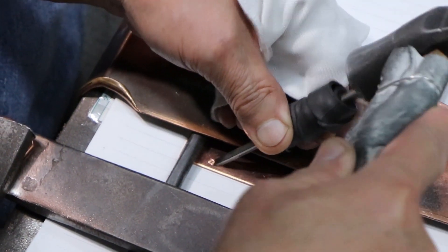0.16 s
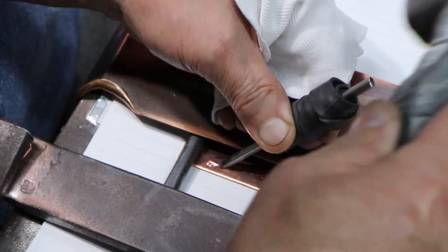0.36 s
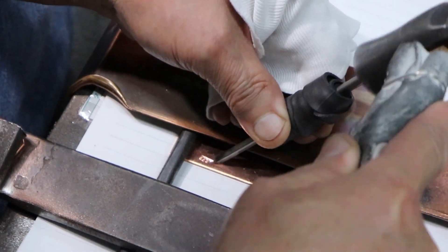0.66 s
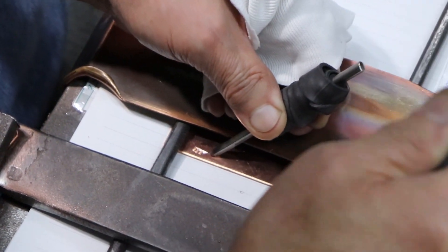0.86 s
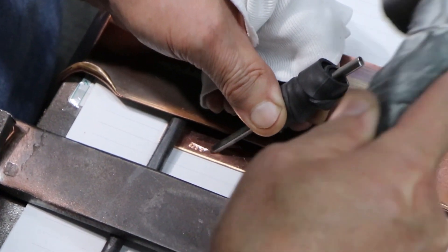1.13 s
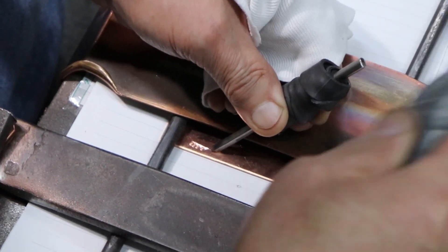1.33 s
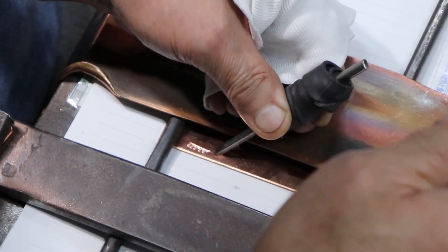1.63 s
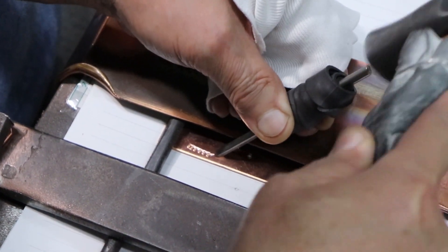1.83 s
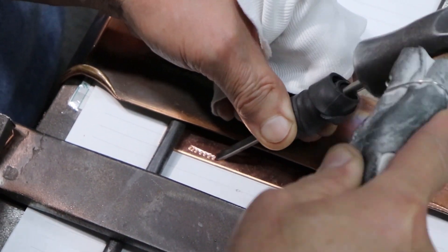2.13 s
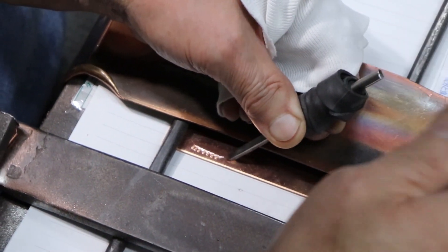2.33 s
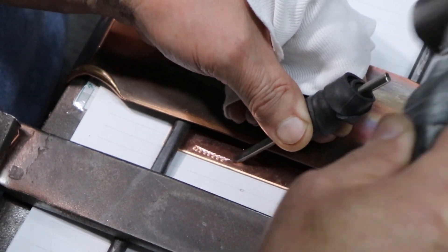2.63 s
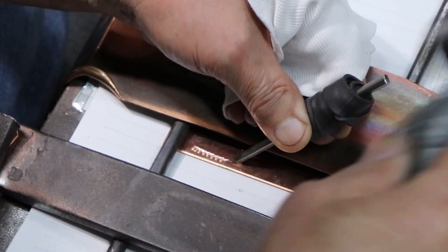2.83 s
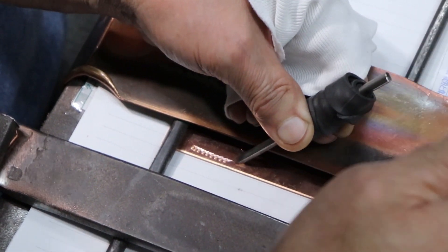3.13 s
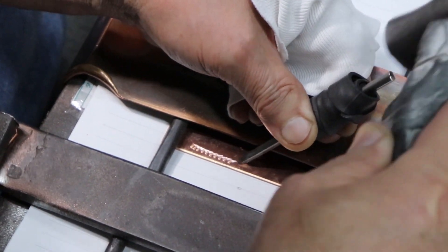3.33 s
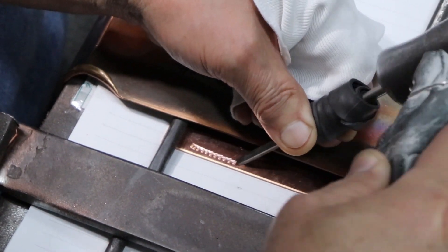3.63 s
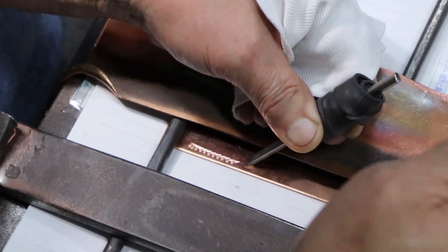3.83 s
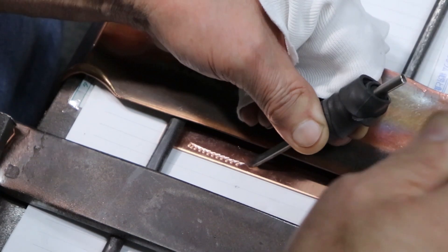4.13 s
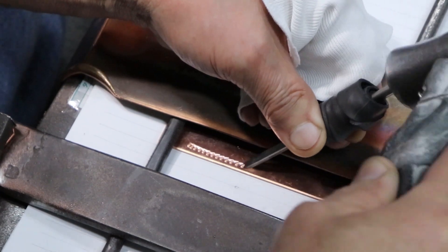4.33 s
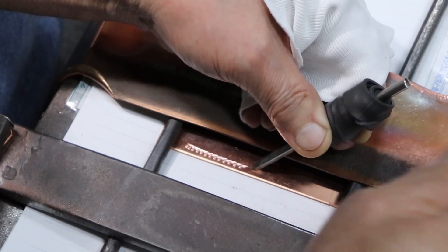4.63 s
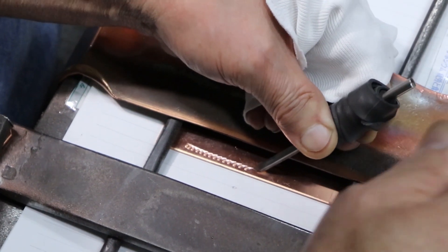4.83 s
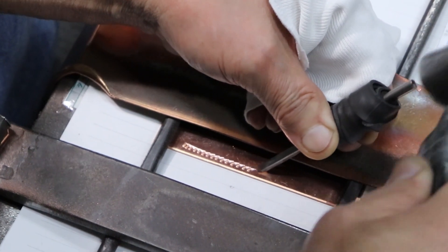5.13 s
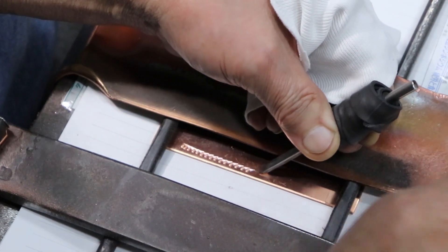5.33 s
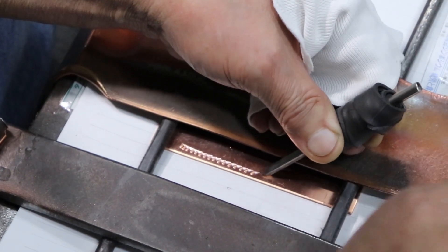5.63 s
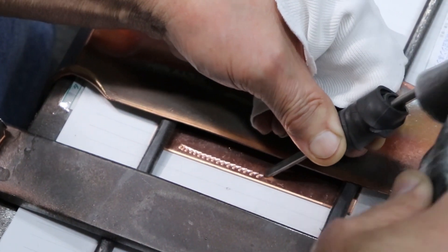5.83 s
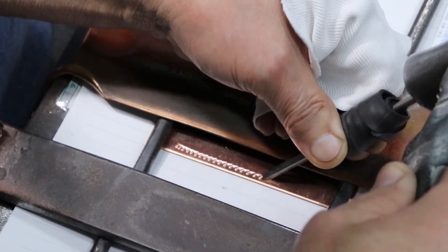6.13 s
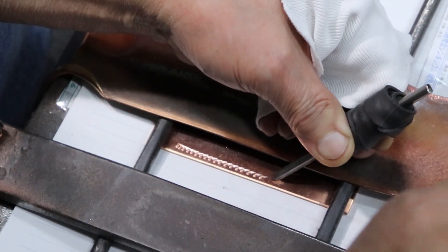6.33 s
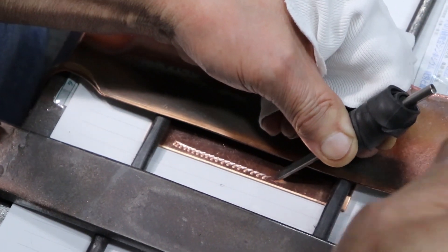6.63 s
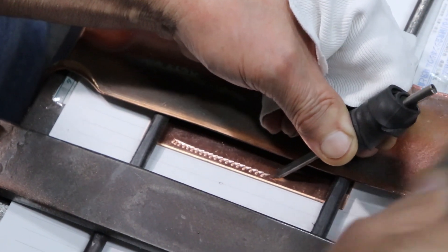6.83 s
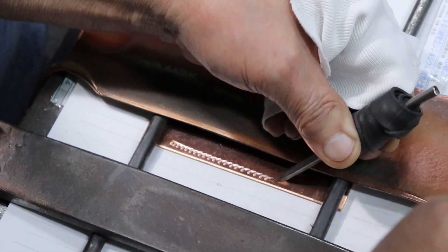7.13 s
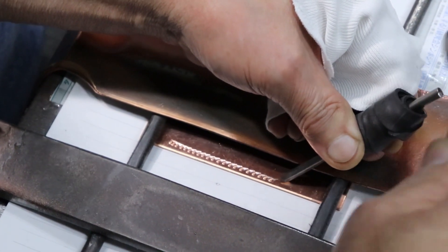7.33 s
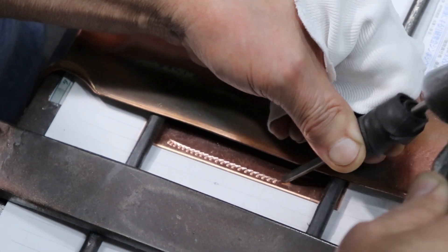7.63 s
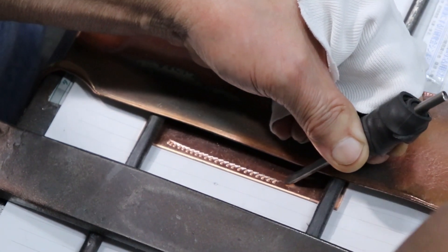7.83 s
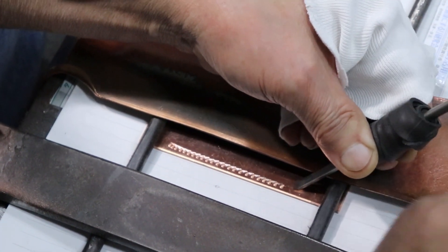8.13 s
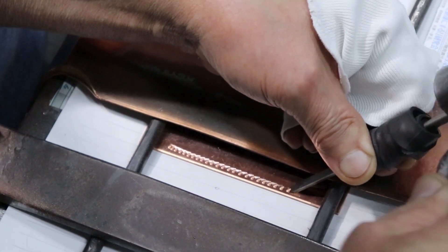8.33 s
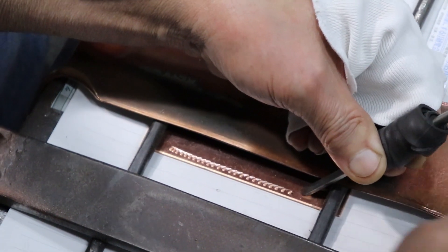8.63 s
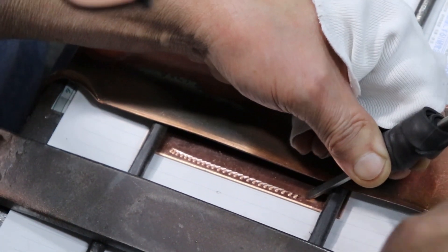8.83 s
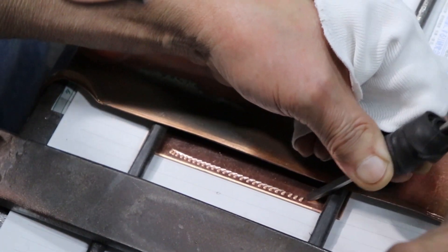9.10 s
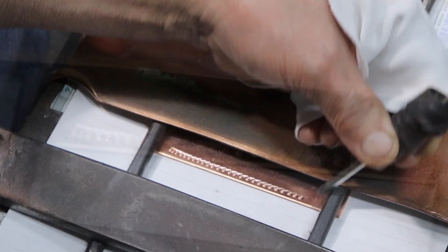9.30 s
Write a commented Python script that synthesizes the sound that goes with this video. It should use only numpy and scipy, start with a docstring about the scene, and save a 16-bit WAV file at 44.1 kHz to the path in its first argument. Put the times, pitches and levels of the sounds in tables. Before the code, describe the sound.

In a quiet workshop with short, lively reverberation, metal hits metal in regular strokes: hammer on chisel, chisel into copper. The clinks are hard, dry and quickly damped, so loud that the close microphone slightly overloads. Early blows have more high chisel ring; later ones gain more bench thump and plate ping. Soft scuffs and knocks of tools are barely audible in the gaps, with a light one after the last blow.

```python
"""Still workshop air (coloured noise), then 25 near-even hammer blows drive a steel chisel along a copper plate.
Each blow cracks (noise burst), rings plate and chisel (damped sines), then thumps the bench a moment later.
Reverberation (convolved noise bands) is heard for about a fifth of a second. From 1.3 s, tools knock lightly
between some blows and after the last (filtered noise). The close microphone overloads (soft ceiling, cut top)."""
import sys
import numpy as np
from scipy import signal
from scipy.fft import rfft, irfft, next_fast_len
from scipy.io import wavfile

SR = 44100
rng = np.random.default_rng(int(sys.argv[2]) if len(sys.argv) > 2 else 0)


def materialize(psi):
    """Save the field psi as 16-bit PCM at rate SR to the path in sys.argv[1].

    A 1-D psi becomes a single channel; in a 2-D psi each row is a channel.
    """
    bounded = np.clip(np.atleast_2d(psi).T, -1, 1)
    quanta = np.round(bounded * 32767).astype(np.int16)
    wavfile.write(sys.argv[1], SR, quanta)


N = 417186
BLOW_SIZE = SR // 4  # samples per dry blow or knock

# Still air. Each row: frequency in Hz, relative density in dB per Hz.
AIR_SPECTRUM = [(15, -10.5), (35, -3), (75, 1), (115, -3), (230, -3), (420, -8), (600, -10.5),
                (1300, -12.5), (2300, -15.5), (3700, -19), (7000, -21.5), (11000, -27), (16000, -32.5)]
AIR_RMS_DB = -50.5
# Stereo likeness of the air. Each row: frequency in Hz, left-right correlation.
AIR_LIKENESS = [(30, 0.91), (250, 0.71), (1000, 0.22), (4000, .3), (16000, .2)]
# Stereo likeness of hits and room. Each row: frequency in Hz, left-right correlation.
HIT_LIKENESS = [(60, .8), (300, 0.94), (700, 0.89), (2000, 0.099), (6000, 0.56), (14000, 0.073)]
# Stereo balance of blows. Each row: frequency in Hz, left minus right in dB.
BALANCE = [(300, -0.5), (600, 0), (1400, -2), (2600, -6), (5000, -2), (9000, -1)]
# Hammer blows. Each row: start in seconds, relative force in dB.
BLOWS = [(0.2543, -2.5), (0.6789, -3.5), (1.081, -2.5), (1.4552, -3), (1.836, -2.5), (2.2158, -2.5),
         (2.5793, -3), (2.945, -3), (3.3096, -3), (3.686, -3), (4.0487, -2.1), (4.4088, -1), (4.7671, -2.5),
         (5.1344, -1.8), (5.4932, -0.5), (5.862, -1), (6.22, -1), (6.5838, -0.5), (6.944, -1.5),
         (7.307, -0.6), (7.67, -0.5), (8.0333, -0.5), (8.3976, -0.5), (8.762, 0), (9.1393, -0.7)]
# Crack of steel on steel. Each row: frequency in Hz, relative density in dB per Hz.
CRACK_SPECTRUM = [(40, -75.5), (200, -56), (600, 0.5), (1500, 0.5), (2800, 5.5), (3800, 1), (5800, -1.5),
                  (6900, -3), (8500, 5.5), (11000, -5), (16000, -12.5)]
# Copper plate and clamp. Each row: frequency in Hz, relative level in dB, T60 in seconds.
PLATE_MODES = [(717, -18.5, .06), (928, -18, 0.021), (959, -32, 0.13), (1099, -5.5, 0.025),
               (1530, -24, 0.032), (2320, -18.5, 0.02), (2640, -9, 0.031), (3452, -10.5, 0.025),
               (4285, -10, 0.036), (5140, -18, 0.0092), (7660, -9, 0.0082), (8920, -2.5, 0.0079),
               (9940, -8.5, 0.0047)]
# Lower plate tone: quiet lasting ring, then strong short knock.
# Each row: frequency in Hz, peak relative level in dB, T60 in seconds.
LOWER_TONE = [(1404, -20.5, .16), (1410, -8.5, .035)]
# Crowd of high plate modes. Each row: frequency in Hz, relative density in dB per Hz.
PING_SPECTRUM = [(3500, -35.5), (4900, -11), (5480, -2.5), (5800, -1.5), (6050, -0.5), (6300, -3),
                 (6800, -19), (9000, -40.5)]
# Chisel as a free bar damped by the fingers.
# Each row: multiple of the easy-hold upper bending mode, relative level in dB, T60 in seconds.
CHISEL_MODES = [(.33, -1.5, 0.01), (0.349, -4.5, 0.012), (0.373, -5.5, 0.025), (0.998, 0.5, 0.022)]
# Tip chatter in the cut, smearing the ring.
# Each row: multiple of the easy-hold upper bending mode, relative density in dB per Hz.
CHATTER_SPECTRUM = [(0.251, -30), (0.331, -6), (0.374, 4.5), (.45, -23), (.85, -15), (.94, -5), (1.039, 2),
                    (1.102, -11), (1.25, -28.5), (2.001, -35.5)]
# Fingers' hold, interpolated. Each row: time in seconds, chisel gain in dB, upper bending mode in Hz.
GRIP = [(.68, 3, 7480), (1.08, 5, 8255), (3.68, 5, 8250), (4.401, -1, 7930), (5.149, -7, 7730),
        (5.86, -20, 7420), (6.22, -10, 8100), (7.6, -8.5, 8420), (9.14, -10, 9130)]
# Bench under the work. Each row: frequency in Hz, relative level in dB, T60 in seconds.
BENCH_MODES = [(302.4, -9.5, 0.025), (340, 6, 0.028), (403.4, 7.5, 0.021), (509, -16.5, 0.056)]
# Standing waves stirred by the thump. Each row: frequency in Hz, relative level in dB, T60 in seconds.
BOOM_MODES = [(209, -34, 0.54), (243, -38.5, 0.81), (282.6, -31, 0.45), (291, -28, 0.41), (315, -24, 0.32),
              (378, -27, 0.31), (394, -27, 0.17), (454, -24, 0.067)]
# Room wash. Each row: band centre in Hz, relative level in dB, T60 in seconds before the tail is faded out.
ROOM_BANDS = [(61.6, -29.5, 0.43), (151.2, -13.5, .35), (222, -9, 0.21), (310, -12, 0.96),
              (445.4, -8.5, 0.46), (810, -13, 0.55), (1440, -9, 0.45), (3100, -14, 0.42), (6400, -10, .45),
              (9000, -11, 0.4), (12000, -11, 0.47), (16000, -20.5, .3)]
# Wall clusters. Each row: delay in seconds, lift over the wash in dB, spread in seconds.
WALLS = [(.018, 5, 0.0034), (0.071, 2.5, 0.0041), (.135, 0.5, .015)]
# Tool knocks and scuffs. Each row: start in seconds, relative level in dB, lowpass corner in Hz, T60 in seconds.
KNOCKS = [(1.298, -42, 597, 0.083), (1.789, -42.5, 598, .14), (2.185, -43.5, 593, 0.14),
          (3.187, -45, 900, 0.047), (4.118, -35, 2527, 0.037), (4.294, -39.5, 893, 0.082),
          (5.005, -33, 2520, 0.063), (5.055, -32, 890, 0.18), (9.356, -32, 6000, 0.064),
          (9.419, -34.5, 5000, 0.037), (9.426, -38.5, 3500, 0.042)]
# Knock colour before the lowpass. Each row: frequency in Hz, relative density in dB per Hz.
KNOCK_SPECTRUM = [(100, -10), (300, 3.5), (700, -1.5), (1400, -2.5), (2300, 2), (4000, -10.5), (8000, -7.5),
                  (16000, -23)]

# The chisel moves steadily towards the clamp: more thump, more high plate modes.
MIDWAY_S, THUMP_DB_PER_S, PING_DB_PER_S = 4.7, 0.44, 0.28
# Upper plate tone: pitch at midway, rising with travel.
UPPER_HZ, UPPER_RISE_HZ_PER_S, UPPER_PEAK_DB, UPPER_T60_S = 1986, 15, 2.5, 0.03
# Each tone peaks as the chisel passes its antinode.
UPPER_ANTINODE_S, UPPER_FADE_DB_PER_S2 = 4.2, 0.5
LOWER_ANTINODE_S, LOWER_FADE_DB_PER_S2 = 6, 0.5
EASY_HZ = 8300  # upper bending mode under an easy hold


def from_db(db):
    """Convert decibels to amplitude gain."""
    return 10 ** (np.asarray(db) / 20)


def at_hz(points, hz, axis=1):
    """Interpolate a table column over log frequency."""
    points = np.array(points, float)
    return np.interp(np.log(np.maximum(hz, 1)), np.log(points[:, 0]), points[:, axis])


def add(track, start_s, sound):
    """Mix a stereo sound into the track."""
    start = round(start_s * SR)
    track[:, start:start + sound.shape[1]] += sound[:, :N - start]


def noise(spectrum, likeness, size):
    """Shape white mid and side noise by colour and left-right correlation; rms 1."""
    hz = np.fft.rfftfreq(size, 1 / SR)
    mid, side = rfft(rng.standard_normal((2, size)))
    alike = np.clip(at_hz(likeness, hz), -1, 1)
    stereo = np.sqrt(1 + alike) * mid + np.sqrt(1 - alike) * side * [[1], [-1]]
    out = irfft(stereo * from_db(at_hz(spectrum, hz)), size)
    return out / out.std()


def air():
    """Still air as steady coloured noise."""
    return from_db(AIR_RMS_DB) * noise(AIR_SPECTRUM, AIR_LIKENESS, next_fast_len(N))[:, :N]


def crack(spectrum, t60_s):
    """A burst of scattered waves: random phases, smooth magnitude; starts at about rms 1."""
    t = np.arange(BLOW_SIZE) / SR
    hz = np.fft.rfftfreq(BLOW_SIZE, 1 / SR)
    fading = from_db(-60 * t / t60_s)
    # The phase of fading noise holds the burst's timing.
    phase = np.angle(rfft(noise(spectrum, HIT_LIKENESS, BLOW_SIZE) * fading))
    colour = from_db(at_hz(spectrum, hz) + at_hz(BALANCE, hz) * [[0.5], [-0.5]])
    burst = irfft(colour * np.exp(1j * phase), BLOW_SIZE) * fading ** 0.25
    return burst / burst.std() * np.sqrt(np.mean(fading ** 2))


def ring(modes, scatter_db, detune, lag_s):
    """Damped sines; strength, pitch and ear paths vary slightly at random per call."""
    hz, db, t60_s = np.array(modes, float).T[:, :, None]
    strength, pitch, path = rng.standard_normal((3, len(hz), 1))
    t = np.arange(BLOW_SIZE) / SR
    hz = hz * (1 + detune * pitch)
    decay = from_db(db + scatter_db * strength) * np.exp(-np.log(1000) * t / t60_s)
    ears = []
    for side in (0.5, -0.5):
        gain = from_db(side * at_hz(BALANCE, hz))
        wave = np.sin(2 * np.pi * hz * (t + side * lag_s * path))
        ears.append((gain * decay * wave).sum(0))
    return np.array(ears)


def plate(blow_s, crack_db=7.0, crack_t60_s=0.033, ping_t60_s=0.031):
    """Contact crack and copper ring, coloured by where the chisel stands."""
    travel_s = blow_s - MIDWAY_S
    upper_hz = UPPER_HZ + UPPER_RISE_HZ_PER_S * travel_s
    upper_db = UPPER_PEAK_DB - UPPER_FADE_DB_PER_S2 * (blow_s - UPPER_ANTINODE_S) ** 2
    lower_fade_db = LOWER_FADE_DB_PER_S2 * (blow_s - LOWER_ANTINODE_S) ** 2
    lower = [(hz, db - lower_fade_db, t60_s) for hz, db, t60_s in LOWER_TONE]
    modes = [*PLATE_MODES, (upper_hz, upper_db, UPPER_T60_S), *lower]
    tones = ring(modes, scatter_db=1.0, detune=0.003, lag_s=0.00003)
    ping = from_db(PING_DB_PER_S * travel_s) * crack(PING_SPECTRUM, ping_t60_s)
    return from_db(crack_db) * crack(CRACK_SPECTRUM, crack_t60_s) + tones + ping


def chisel(blow_s, bending_db=0.46, chatter_db=4.5):
    """The steel bends and its tip chatters; the grip frees or chokes it and shifts its pitch."""
    times_s, gains_db, uppers_hz = np.transpose(GRIP)
    grip_db = np.interp(blow_s, times_s, gains_db)
    upper_hz = np.interp(blow_s, times_s, uppers_hz)

    def mode_hz(multiple):
        """Lower modes follow the grip's shift only in proportion to their pitch."""
        return multiple * (EASY_HZ + min(multiple, 1) * (upper_hz - EASY_HZ))

    modes = [(mode_hz(multiple), db, t60_s) for multiple, db, t60_s in CHISEL_MODES]
    bending = ring(modes, scatter_db=1.3, detune=0.0099, lag_s=0.000025)
    spectrum = [(mode_hz(multiple), db) for multiple, db in CHATTER_SPECTRUM]
    chatter = crack(spectrum, t60_s=0.024)
    return from_db(grip_db) * (from_db(bending_db) * bending + from_db(chatter_db) * chatter)


def thump(blow_s, bench_db=0.25, boom_db=-0.9, delay_s=0.0028, swell_s=0.0046, low_cut_hz=205):
    """The heavy bench gives way a moment after the blow and stirs the room's standing waves."""
    t = np.arange(BLOW_SIZE) / SR
    bench = from_db(bench_db) * ring(BENCH_MODES, scatter_db=1.5, detune=0.011, lag_s=0.00008)
    boom = from_db(boom_db) * ring(BOOM_MODES, scatter_db=1.0, detune=0.013, lag_s=0.00024)
    swelling = (bench + boom) * (1 - np.exp(-t / swell_s))
    low_cut = signal.butter(4, low_cut_hz, "high", fs=SR, output="sos")
    push = signal.sosfilt(low_cut, swelling)
    delayed = np.array([np.interp(t - delay_s, t, side) for side in push])
    return from_db(THUMP_DB_PER_S * (blow_s - MIDWAY_S)) * delayed


def blows():
    """Each blow's force drives plate, chisel and bench together; yields (start in s, sound)."""
    for blow_s, force_db in BLOWS:
        yield blow_s, from_db(force_db) * (plate(blow_s) + chisel(blow_s) + thump(blow_s))


def workshop(events, wet_db=-6.5, build_s=0.0009, tail_fade_s=0.175):
    """Dense reflections build and die band by band, drawn afresh for every event."""
    size = SR // 3
    out = np.zeros((2, N))
    t = np.arange(size) / SR
    hz = np.fft.rfftfreq(size, 1 / SR)
    centres_hz, band_db, t60_s = np.array(ROOM_BANDS, float).T
    # Overlapping triangular bands on log frequency.
    bands = np.array([at_hz(np.c_[centres_hz, one], hz) for one in np.eye(len(ROOM_BANDS))])
    clusters_db = sum(lift_db * np.exp(-((t - delay_s) / spread_s) ** 2) for delay_s, lift_db, spread_s in WALLS)
    build = 1 - np.exp(-(t / build_s) ** 2)
    tail_fade = 1 / np.sqrt(1 + (t / tail_fade_s) ** 9)
    decay = from_db(clusters_db - 60 * t / t60_s[:, None]) * build * tail_fade
    decay = decay * (from_db(band_db + wet_db) / np.linalg.norm(decay, axis=1))[:, None]
    for start_s, sound in events:
        paths = rfft(noise([(20, 0), (20000, 0)], HIT_LIKENESS, size))  # white
        response = (irfft(paths[:, None] * bands, size) * decay).sum(1)
        add(out, start_s, sound)
        add(out, start_s, signal.fftconvolve(sound, response, axes=1))
    return out


def knocks(level_db=-3.0):
    """Short, soft contacts as lowpassed, decaying noise; yields (start in s, sound)."""
    t = np.arange(BLOW_SIZE) / SR
    for start_s, db, corner_hz, t60_s in KNOCKS:
        b, a = signal.butter(1, corner_hz, fs=SR)
        touch = signal.lfilter(b, a, noise(KNOCK_SPECTRUM, HIT_LIKENESS, BLOW_SIZE))
        yield start_s, touch / touch.std() * from_db(level_db + db - 60 * t / t60_s)


def scene():
    """Still air, plus blows and knocks in the room."""
    still_air = air()
    return still_air + workshop([*blows(), *knocks()])


def record(dry, ceiling=0.99, cutoff_hz=16300):
    """The microphone saturates: peaks flatten towards a ceiling; then a lowpass cuts the top."""
    clipped = dry / (1 + (dry / ceiling) ** 8) ** (1 / 8)
    return signal.sosfiltfilt(signal.butter(14, cutoff_hz, fs=SR, output="sos"), clipped)


dry = scene()
out = record(dry)
materialize(out)
```